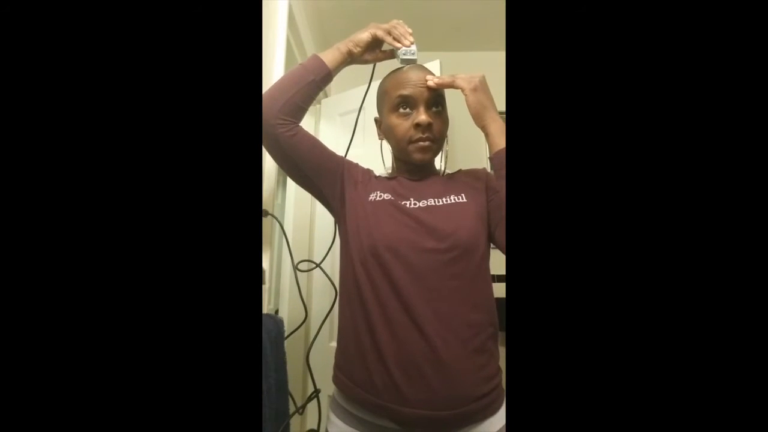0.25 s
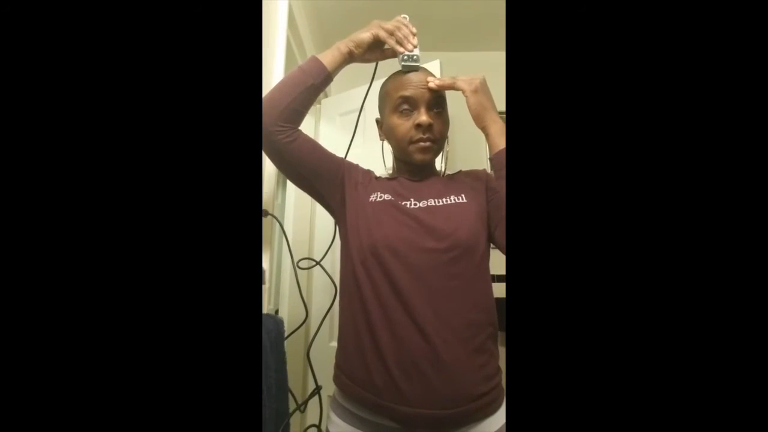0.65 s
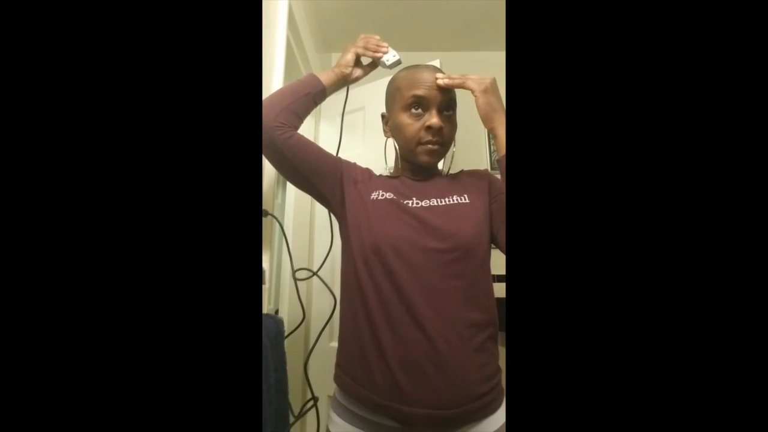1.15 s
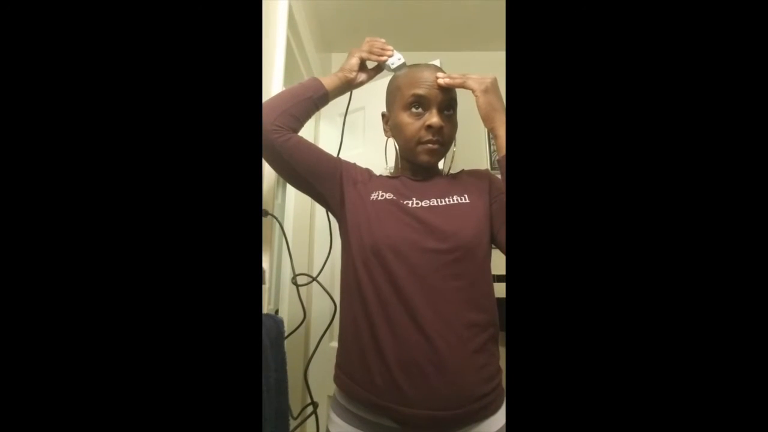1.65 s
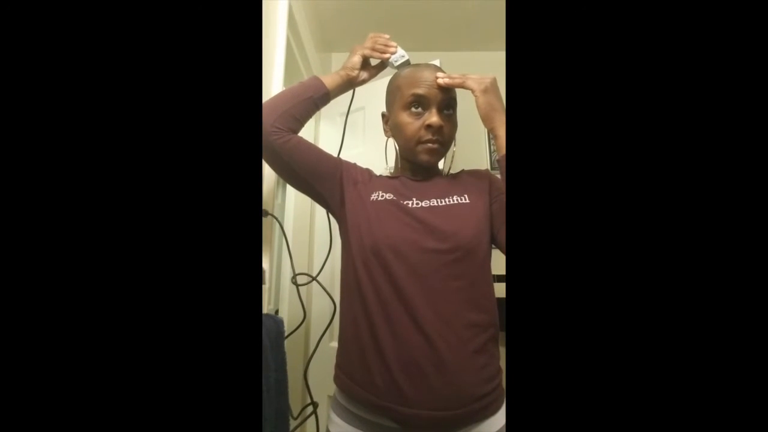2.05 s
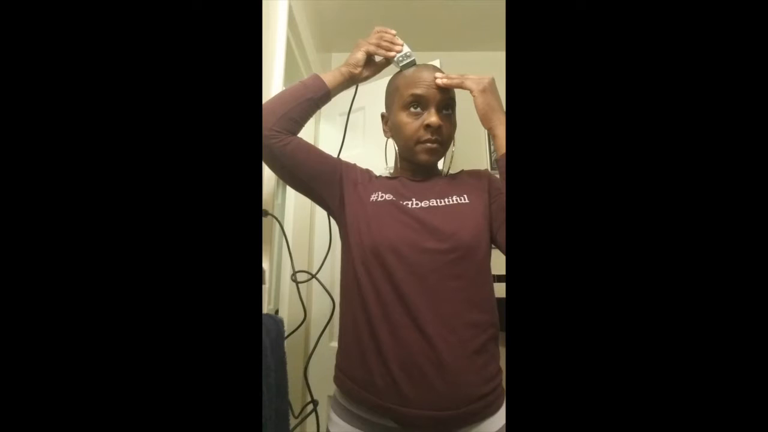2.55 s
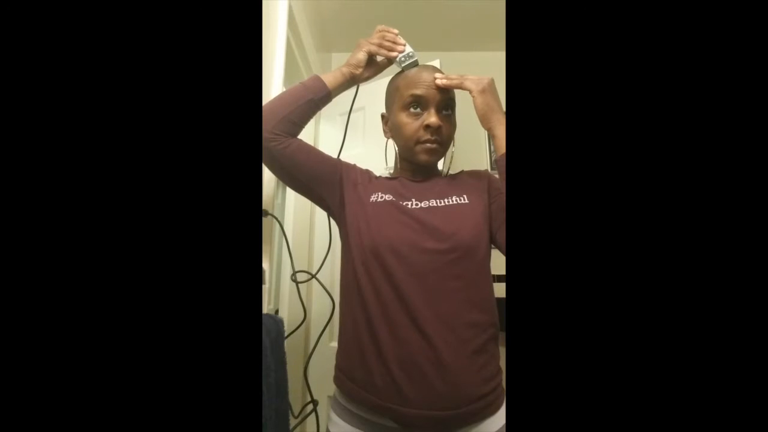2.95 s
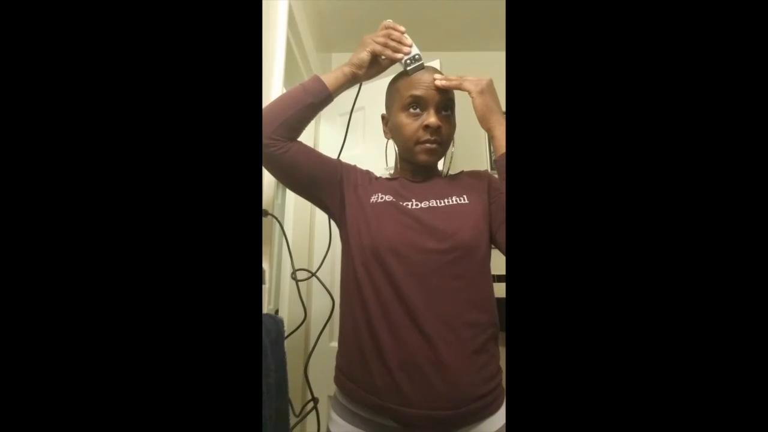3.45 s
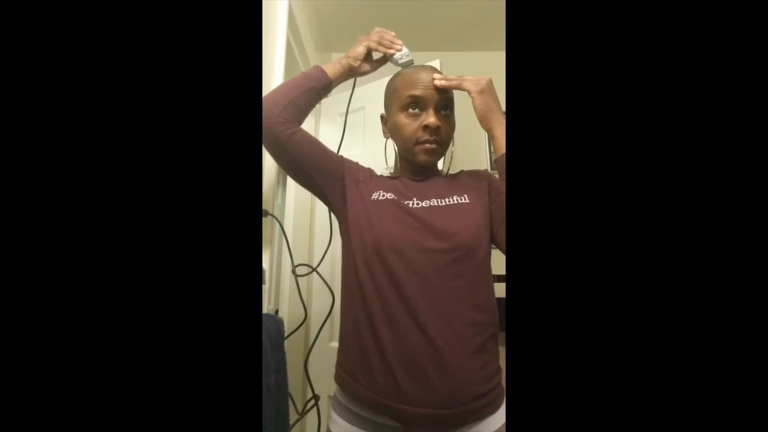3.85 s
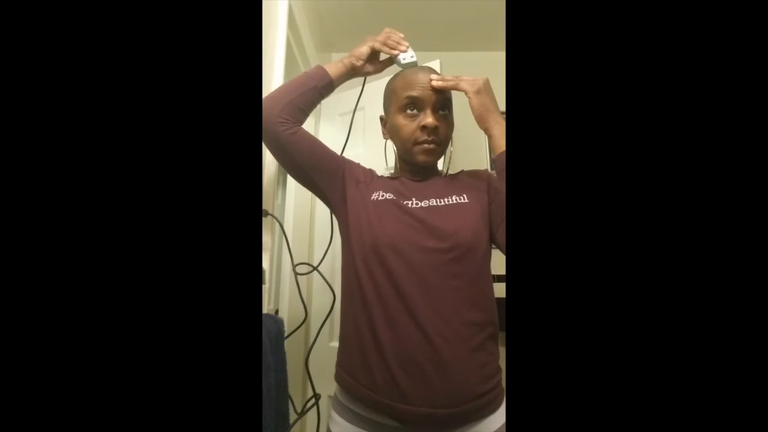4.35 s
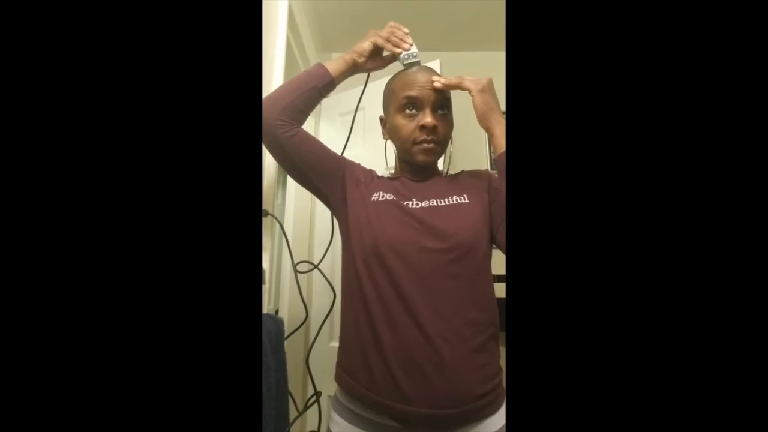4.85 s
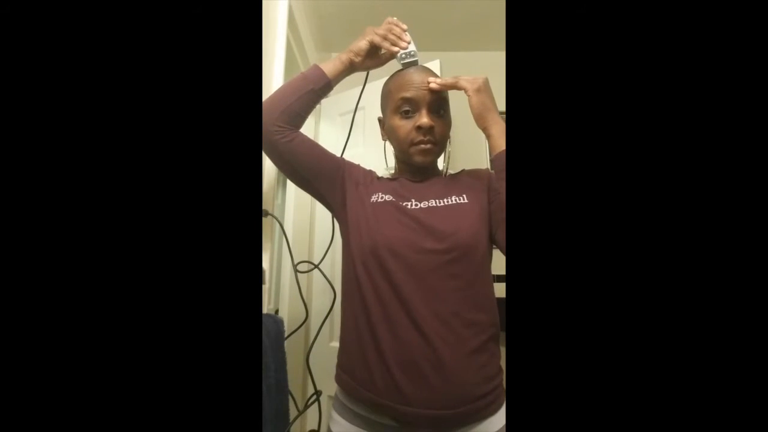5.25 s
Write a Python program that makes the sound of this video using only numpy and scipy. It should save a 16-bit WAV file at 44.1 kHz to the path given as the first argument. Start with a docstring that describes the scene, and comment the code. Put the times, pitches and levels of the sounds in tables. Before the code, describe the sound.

One mono microphone in a small indoor room picks up a corded clipper's constant rapid buzz. After half a second a muffled door-like thump sounds farther off and dies quickly. The clipper lifts and becomes lighter and hissier, then presses again, fuller and ringing, with brief flares. It eases again shortly before four seconds, returns strongly, and is still running at the end.

```python
"""A mains-driven hair clipper is moved over a shaved scalp in a small room.
From the start its magnet swings the blade 120 times a second: a comb of tones, and noise pulsing twice a swing.
Pressed on the skin, the teeth scrape, the housing rings and other tones of the swing come forward.
Half a second in, a soft, dull, door-like thud sounds at some distance: rough blows set low modes ringing.
When the blade is lifted, first after about a second, a broad band of noise above the main ring comes out."""
import sys
import numpy as np
from scipy import signal
from scipy.fft import rfft, irfft, next_fast_len
from scipy.io import wavfile
from scipy.ndimage import uniform_filter1d

SR = 44100
rng = np.random.default_rng(int(sys.argv[2]) if len(sys.argv) > 2 else 0)


def pcm_store(signal):
    """Save signal as 16-bit PCM."""
    levels = np.round(np.clip(np.atleast_2d(signal), -1, 1) * 32767)
    wavfile.write(sys.argv[1], SR, levels.astype(np.int16).T)


N = 242991

SWING_HZ = 120.08

# Resonances of the blade. Each row: centre in Hz, width in Hz, peak of the added power in dB over the spectrum.
BLADE_RESONANCES = [(3500, 240, -2), (5630, 410, 1), (7970, 720, 7), (9460, 200, 2), (10440, 260, -14),
                    (12600, 430, 1), (14300, 430, -2), (15450, 400, 10.5)]


def from_db(db):
    """Amplitude ratio of a level: twenty decibels are a factor of ten."""
    return 10 ** (np.asarray(db) / 20)


def rms_one(x):
    """Normalisation: equal mean power makes levels comparable."""
    return x / np.sqrt(np.mean(x ** 2) + 1e-20)


def in_time(rows):
    """Linear interpolation of table columns over time, one value a sample."""
    s, *columns = np.transpose(rows)
    return [np.interp(np.arange(N) / SR, s, column) for column in columns]


def swells(rows, half_s):
    """Superposed Gaussian rises of the given heights, each at 1/e of its height half_s from its centre."""
    t = np.arange(N) / SR
    return sum(height * np.exp(-((t - s) / half_s) ** 2) for s, height in rows)


def drift(rate_hz):
    """Slow chance of spread 1: white noise through a double-pole low-pass, at a fortieth of the sample rate."""
    pole = np.exp(-2 * np.pi * rate_hz * 40 / SR)
    white = rng.standard_normal(N // 40 + 4002)
    slow = signal.lfilter([1], [1, -2 * pole, pole * pole], white)[4000:]  # settled part
    return np.interp(np.arange(N) / 40, np.arange(len(slow)), rms_one(slow))


def coloured(x, spectrum, resonances=()):
    """Source-filter principle: a spectrum shapes x and resonances add power around their centres; rms 1."""
    size = next_fast_len(N)
    hz = np.maximum(np.arange(size // 2 + 1) * SR / size, 1)
    point_hz, point_db = np.transpose(spectrum)
    gain = from_db(np.interp(np.log(hz), np.log(point_hz), point_db))
    for centre_hz, width_hz, lift_db in resonances:
        detuning = 2 * (hz - centre_hz) / width_hz
        gain = gain * np.sqrt(1 + from_db(2 * lift_db) / (1 + detuning ** 2) ** 2)
    return rms_one(irfft(rfft(x, size) * gain, size)[:N])


def swing():
    """Forced oscillation: the blade's phase in radians advances at the magnet's drive frequency."""
    return 2 * np.pi * SWING_HZ * np.arange(N) / SR


def swing_tones(table, waver_db, waver_turns):
    """Harmonic series of the swing; as the hand moves, higher members waver more in level and phase."""
    out = np.zeros(N)
    for multiple, level_db in table:
        reach = np.tanh(multiple / 4.5)
        turns = rng.random() + waver_turns * reach * drift(0.45)
        level = from_db(level_db + waver_db * reach * drift(1.8))
        out += level * np.sin(multiple * swing() + 2 * np.pi * turns)
    return out


def stroke_noise(main_db, back_db, grain_db, uneven_db):
    """Amplitude-modulated noise: it swells at both turns of the blade, one stronger, no two strokes alike."""
    both_turns_db = main_db * np.cos(2 * swing() + 1.0)
    one_turn_db = back_db * np.cos(swing() + 3.1)
    gate_db = both_turns_db + one_turn_db + uneven_db * drift(40)
    grains = from_db(grain_db * np.minimum(rng.exponential(1, N), 5))
    return rng.standard_normal(N) * grains * from_db(gate_db)


def above_rest(level_db, rest_db):
    """Power addition: only the power above the resting level belongs to the contact."""
    return np.sqrt(np.maximum(from_db(2 * level_db) - from_db(2 * rest_db), 1e-9))


def skin_contact():
    """Contact loading over the passes: pressure in dB, then gains of housing, teeth scrape and main ring."""
    # Each row: time in seconds, then levels in dB of housing, scrape and ring before flares and resting power.
    passes = [(0.0, -40, -53.5, -36.5), (0.57, -40.5, -55.5, -41), (0.68, -47.5, -61, -41),
              (0.92, -55, -60, -48), (1.32, -50, -60, -52.5), (1.4, -45.5, -55, -43),
              (1.47, -50, -57.5, -46.5), (1.6, -44.5, -55, -42.5), (1.88, -44, -53.5, -41.5),
              (1.98, -38.5, -50, -36), (2.55, -38.5, -49.5, -32.5), (2.65, -43, -55, -38),
              (3.1, -40, -50.5, -36), (3.42, -41, -54, -35.5), (3.58, -48.5, -60.5, -43),
              (3.95, -52, -59, -49.5), (4.07, -41, -54.5, -35.5), (4.3, -36.5, -49, -33),
              (4.62, -38.5, -50.5, -31), (4.8, -44, -56, -38.5), (5.51, -41.5, -54.5, -38)]
    # Brief flares of the main ring. Each row: centre in seconds, lift in dB.
    flares = [(1.39, 4), (1.6, 5), (1.98, 7.5), (2.13, 3), (2.341, 10.5), (2.52, 6), (2.59, 0.5),
              (3.12, 7.5), (3.335, 3), (3.44, 6.5), (4.06, 6), (4.225, 6.5), (4.36, 5), (4.478, 8),
              (4.85, 4.5), (5.03, 2.5), (5.14, 4.5), (5.28, 4), (5.38, 6.5), (5.44, 4.5)]
    housing_db, scrape_db, ring_db = in_time(passes)
    pressure_db = housing_db - housing_db.mean()
    flare_db = swells(flares, half_s=0.022)
    housing = above_rest(housing_db + 0.19 * flare_db, rest_db=-52)  # the housing takes a share of each flare
    scrape = above_rest(scrape_db, rest_db=-61)
    ring = above_rest(ring_db + flare_db, rest_db=-52)
    return pressure_db, housing, scrape, ring


def magnet(pressure_db):
    """Magnetic forcing: a hum at the swing rate, whose overtones partly follow pressure and waver with the grip."""
    # Each row: time in seconds, rms level of the hum in dB.
    hum_levels = [(0.0, -45.5), (1.3, -44.5), (1.8, -43), (3.0, -42), (3.55, -43), (3.9, -46.5), (4.2, -45),
                  (5.51, -44)]
    # Each row: multiple of the swing, level in dB over the hum, dB per dB of pressure, waver in dB.
    overtones = [(5, -8.5, -0.29, 1.5), (6, -7, 0.55, 6), (7, -11, -0.36, -1), (8, -10.5, 0.12, 4),
                 (9, -5.5, 0.2, 3), (15, -22, 0.3, 7)]
    total = np.sin(swing())
    for multiple, over_db, share, waver_db in overtones:
        level = from_db(over_db + share * pressure_db + waver_db * np.tanh(drift(1.7)))
        phase = multiple * swing() + 2 * np.pi * rng.random() + 0.18 * drift(0.64)
        total = total + level * np.sin(phase)
    return np.sqrt(2) * from_db(in_time(hum_levels)[0]) * total


def contact_whine():
    """A single harmonic, 24 times the swing, is modulated in level as the blade's contact comes and goes."""
    # Each row: time in seconds, rms level in dB.
    whine_levels = [(0.0, -72), (0.35, -67.5), (0.62, -69.5), (0.8, -86), (1.5, -84), (1.9, -70),
                    (3.0, -63.5), (3.45, -66.5), (3.65, -88), (3.85, -83), (4.1, -72), (4.5, -67),
                    (4.85, -74), (5.3, -66.5)]
    return np.sqrt(2) * from_db(in_time(whine_levels)[0]) * np.sin(24 * swing())


def free_tones():
    """Harmonics of a periodic motion: the tones of the blade held free."""
    # Each row: multiple of the swing, relative level in dB.
    free_levels = [(2, -20), (3, -11), (4, -49), (10, -7.5), (11, -32), (12, -17), (13, -7.5), (14, -19),
                   (16, -32), (17, -58), (18, -29), (19, -46), (20, -35), (21, -43), (22, -33), (23, -37)]
    return from_db(-43.5) * swing_tones(free_levels, waver_db=4.0, waver_turns=0.11)


def pressed_tones():
    """Loading alters the balance of harmonics: the tones of the blade pressed on the skin."""
    # Each row: multiple of the swing, relative level in dB.
    pressed_levels = [(10, -4.5), (11, -3), (12, 0), (13, -1), (14, -10), (16, -21), (17, -24.5), (18, -37),
                      (19, -45), (20, -27.5), (21, -32), (22, -31), (23, -27.5)]
    return from_db(-3.5) * swing_tones(pressed_levels, waver_db=4.0, waver_turns=0.14)


def housing_noise():
    """Resonant radiation: stroke noise is coloured by the housing and its resonances."""
    # Each row: frequency in Hz, relative density in dB per Hz.
    housing_colour = [(240, -65), (400, -41), (461, -21), (587, -8), (720, -2.5), (797, -15), (1010, -9),
                      (1490, 0), (1590, 8), (1810, -39.5), (2600, -25.5), (3380, -55), (5720, -120)]
    # Each row: centre in Hz, width in Hz, peak of the added power in dB over the spectrum.
    housing_resonances = [(724, 28, 7), (1207, 114, 9), (1340, 240, -4.5)]
    strokes = stroke_noise(main_db=2.1, back_db=1.5, grain_db=2.0, uneven_db=1.65)
    return from_db(0.5) * coloured(strokes, housing_colour, housing_resonances)


def evened(x):
    """Level compression: division by a power of the running mean square holds chance swells down; rms 1."""
    evenness, span_s = 0.37, 0.041  # 0 leaves the swells, 1 nearly flattens them
    power = uniform_filter1d(x ** 2, round(span_s * SR)) + 0.01
    return rms_one(x / power ** (evenness / 2))


def main_ring():
    """Narrow-band noise: strokes excite a resonance near 1.6 kHz, with its chance swells held down."""
    # Each row: frequency in Hz, relative density in dB per Hz.
    ring_colour = [(1000, -78), (1450, -31), (1550, -7), (1590, 9.5), (1620, -1), (1645, -0.5), (1720, -29),
                   (1850, -46), (2600, -88)]
    strokes = stroke_noise(main_db=2.4, back_db=0.41, grain_db=0.96, uneven_db=0.96)
    return from_db(-1.5) * evened(coloured(strokes, ring_colour))


def blade_rattle():
    """Repeated impact: noise pulsing at both turns of the blade excites its resonances."""
    # Each row: frequency in Hz, relative density in dB per Hz.
    rattle_colour = [(1180, -46), (2000, 2), (2240, -19), (2400, -35), (2610, 0.5), (3440, -1),
                     (4050, -1.5), (4570, 7), (5340, -2.5), (6020, -1.5), (6400, 3), (8140, -27),
                     (8950, -9), (10200, -2.5), (15700, -1.5)]
    strokes = stroke_noise(main_db=2.2, back_db=1.5, grain_db=1.6, uneven_db=1.7)
    return from_db(-61) * coloured(strokes, rattle_colour, BLADE_RESONANCES)


def teeth_scrape():
    """Friction noise: the teeth on the skin excite the blade's resonances with each stroke."""
    # Each row: frequency in Hz, relative density in dB per Hz.
    scrape_colour = [(1180, -52), (2000, -13), (2180, -2), (2360, 1), (2520, -4), (3130, -5), (3720, 3),
                     (4090, -3.5), (5720, 2), (6850, -4.5), (7870, 3), (8650, -7), (9930, -6.5),
                     (12600, -1), (15700, -7.5)]
    strokes = stroke_noise(main_db=2.2, back_db=0.8, grain_db=0.6, uneven_db=1.0)
    return from_db(-0.5) * coloured(strokes, scrape_colour, BLADE_RESONANCES)


def bounced(x):
    """Interference: short echoes off hand and head come and go as the hand turns, shifting the treble colour."""
    # Each row: lag in milliseconds, level in dB that a slow drift of spread 1 then scales.
    echoes = [(.21, -14.5), (.35, -20), (.62, -22), (0.899, -13.5), (1.7, -12.5)]
    at = np.arange(N)
    out = x.copy()
    for lag_ms, db in echoes:
        late = np.interp(at - round(lag_ms * SR / 1000), at, x)
        out += from_db(db) * drift(0.89) * late
    return out


def blade_tick(scrape, waver_db):
    """A periodic tick as its high harmonics: each fades on its own, and timing slips blur the highest."""
    # The blade free. Each row: frequency in Hz, level in dB.
    free_tick = [(3000, -95), (4200, -84), (5500, -83), (6900, -90), (7900, -89), (9000, -90), (10500, -90),
                 (12000, -100)]
    # The blade pressed. Each row: frequency in Hz, level in dB over the scrape gain.
    pressed_tick = [(3000, -30), (4200, -25), (5500, -26), (6900, -26.5), (7900, -44), (9000, -28),
                    (10500, -41), (12000, -33)]
    out, turn = np.zeros(N), swing()
    for k in range(25, 100):
        free_db = np.interp(k * SWING_HZ, *np.transpose(free_tick))
        pressed_db = np.interp(k * SWING_HZ, *np.transpose(pressed_tick))
        level = (from_db(free_db) + from_db(pressed_db) * scrape) * from_db(waver_db * drift(1.94))
        slipped = turn + 0.0089 * drift(2.0) - 2.6
        out += level * np.sin(k * slipped + 1.32 * rng.standard_normal())
    return out


def clipper():
    """Superposition: the tones and rattle of the swing, plus what the pressure on the skin adds."""
    pressure_db, housing, scrape, ring = skin_contact()
    running = magnet(pressure_db) + contact_whine() + free_tones()
    body = housing * (pressed_tones() + housing_noise())
    treble = bounced(blade_rattle() + scrape * teeth_scrape())
    return running + body + ring * main_ring() + treble + blade_tick(scrape, waver_db=4.5)


def idle_noise():
    """Stationary filtered noise: the low noise of the running housing and the room."""
    # Each row: frequency in Hz, relative density in dB per Hz.
    idle_colour = [(15, -61), (25, -32), (65, -13), (118, -7), (175, -14.5), (365, -18.5), (427, -27),
                   (594, -10.5), (667, -17), (842, -8.5), (1290, -14), (1630, -9.5), (2600, -37.5),
                   (3380, -53), (5720, -120)]
    return from_db(-48.5) * coloured(rng.standard_normal(N), idle_colour, [(1674, 200, 2.8)])


def thud_tail(knock_s):
    """Reverberant decay: dull room noise rises just ahead of the first blow and dies away exponentially."""
    since = np.arange(N) / SR - knock_s + 0.0095
    # Each row: frequency in Hz, relative density in dB per Hz.
    colour = [(60, -20), (100, 0), (160, -8), (250, -12), (450, -0.5), (1000, 1.5), (1600, -33)]
    noise = coloured(rng.standard_normal(N), colour)
    t60_s = 0.4
    decay = from_db(-35 - 60 * np.maximum(since, 0) / t60_s)
    return np.clip(since / 0.0079, 0, 1) * noise * decay


def thud():
    """Modal excitation: a knock and ever duller shudders drive low modes; dull noise dies away under them."""
    # The knock and its shudders. Each row: start in seconds, relative level in dB.
    blows = [(.526, -34.5), (.553, -32), (.585, -37.5), (.628, -40), (.712, -51)]
    # Each row: frequency in Hz, relative level in dB, time to decay by 60 dB in seconds.
    low_modes = [(89, -12, 0.32), (146.3, -11.5, 0.59), (157.2, -10.5, 0.43), (200, -35, 0.22),
                 (283, -12, 0.099), (420, -4, 0.035), (610, -26, 0.032), (942, 6, 0.04)]
    dulling_db = -3  # per octave above 146 Hz, more with each shudder
    out, burst = np.zeros(N), round(0.01096 * SR)
    rough = rng.standard_normal((len(blows), burst)) * np.hanning(burst) / np.sqrt(burst)
    rough[:, :40] += np.hanning(40) / 12  # the push that starts each blow
    for hz, mode_db, t60_s in low_modes:
        force = np.full(N, 1e-18)
        octaves = np.log2(hz / 146)
        for k, (s, blow_db) in enumerate(blows):
            at = round(s * SR)
            force[at:at + burst] += rough[k] * from_db(blow_db + mode_db + k * dulling_db * octaves)
        r, w = from_db(-60 / (t60_s * SR)), 2 * np.pi * hz / SR
        out += signal.lfilter([0, np.sin(w)], [1, -2 * r * np.cos(w), r * r], force)
    out += thud_tail(blows[0][0])
    soft_and_distant = signal.butter(3, [75, 1400], "band", fs=SR, output="sos")
    return signal.sosfilt(soft_and_distant, out)


def upper_ring():
    """Broad resonance: stroke noise above the main ring comes out when the blade is lifted."""
    # Each row: centre in seconds, half length in seconds, level in dB added to the resting level.
    lifts = [(1.1, 0.14, -49.5), (1.386, 0.063, -55), (3.763, 0.2, -56)]
    # Each row: frequency in Hz, relative density in dB per Hz.
    upper_colour = [(1100, -78), (1600, -35), (1720, 8.5), (1800, -11.5), (2000, -6.5), (2200, -26),
                    (2500, -36), (3200, -88)]
    level = from_db(-66.5)  # resting level
    for s, half_s, db in lifts:
        level = level + swells([(s, from_db(db))], half_s)
    strokes = stroke_noise(main_db=1.4, back_db=1.5, grain_db=1.1, uneven_db=2.4)
    return level * coloured(strokes, upper_colour)


def scene():
    """Superposition of all pressures at one microphone."""
    return (clipper() + idle_noise() + thud() + upper_ring())[None]


def record(dry):
    """Band limitation: a steep elliptic low-pass cuts the top at 15760 Hz."""
    low_pass = signal.ellip(14, .5, 60, 15760, fs=SR, output="sos")  # ripple 0.5 dB, stop band 60 dB down
    return signal.sosfilt(low_pass, dry)


dry = scene()
out = record(dry)
pcm_store(out)
```